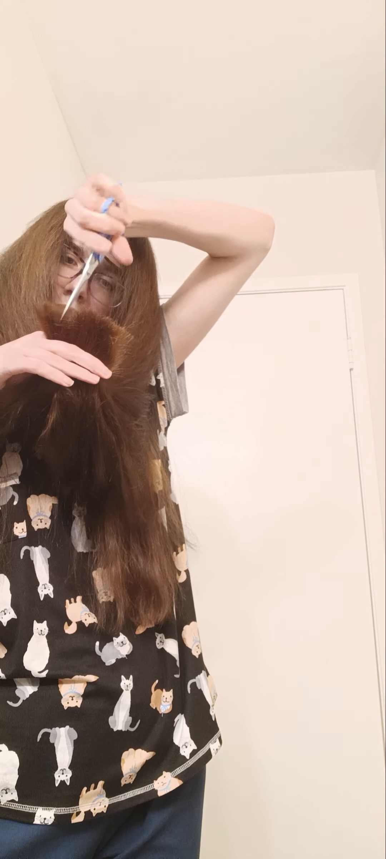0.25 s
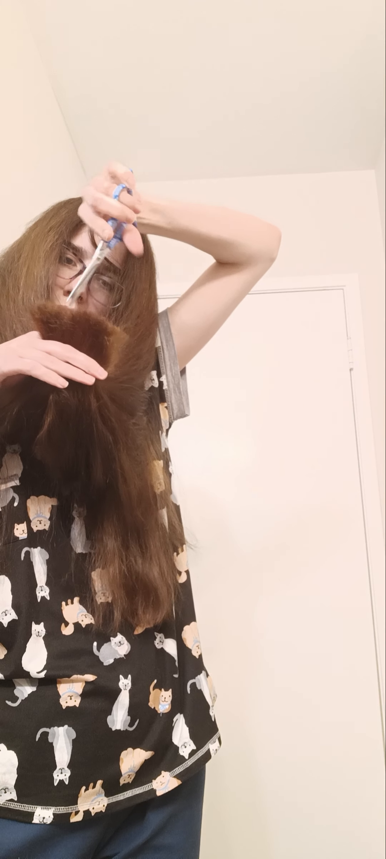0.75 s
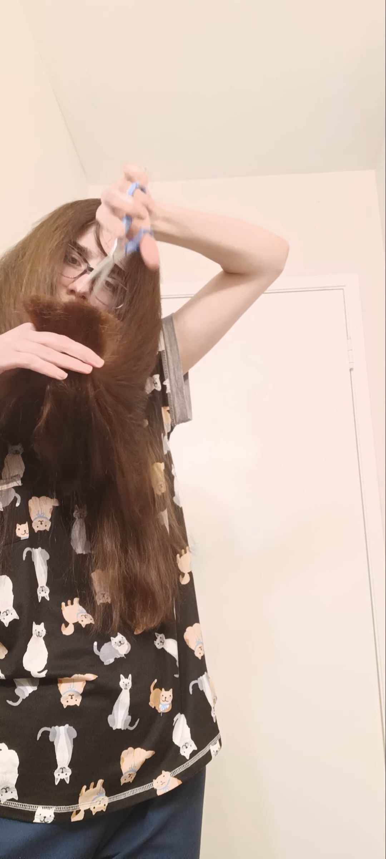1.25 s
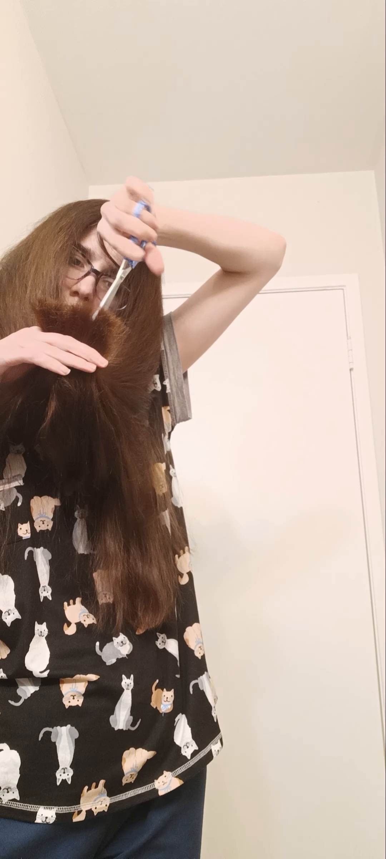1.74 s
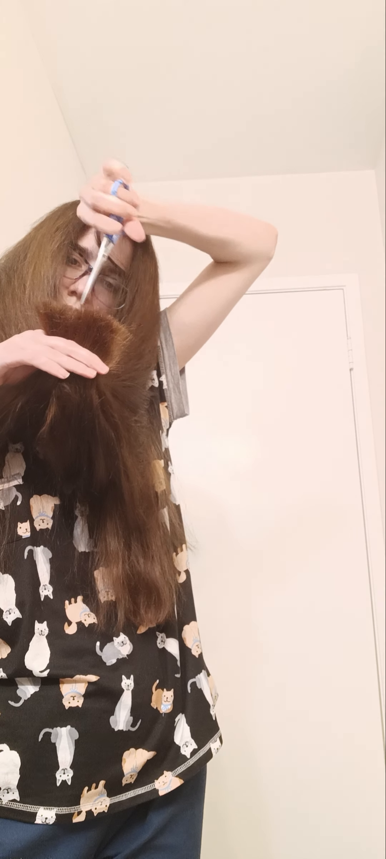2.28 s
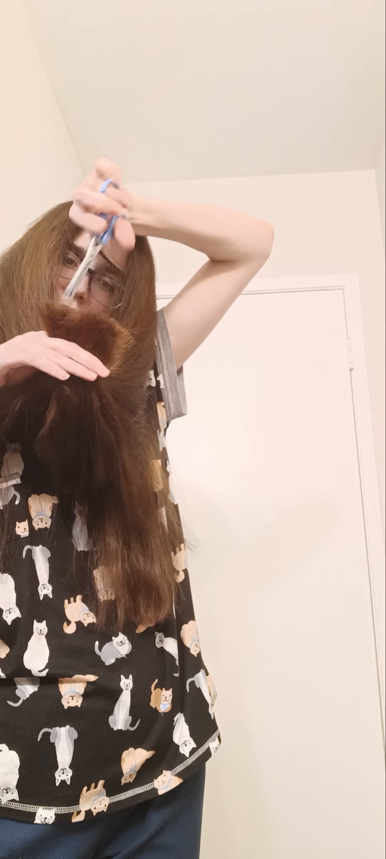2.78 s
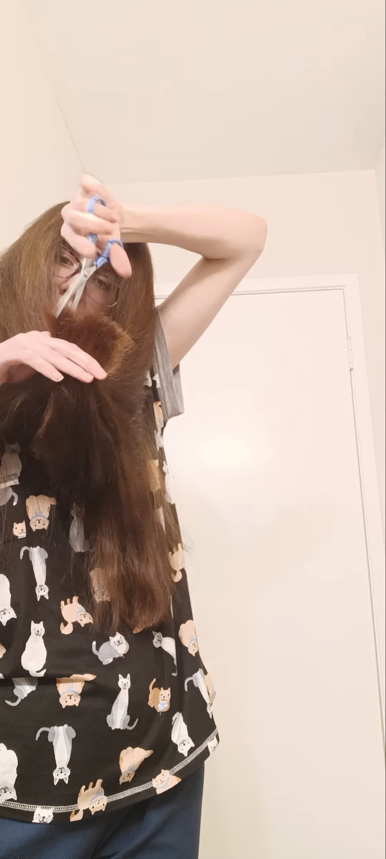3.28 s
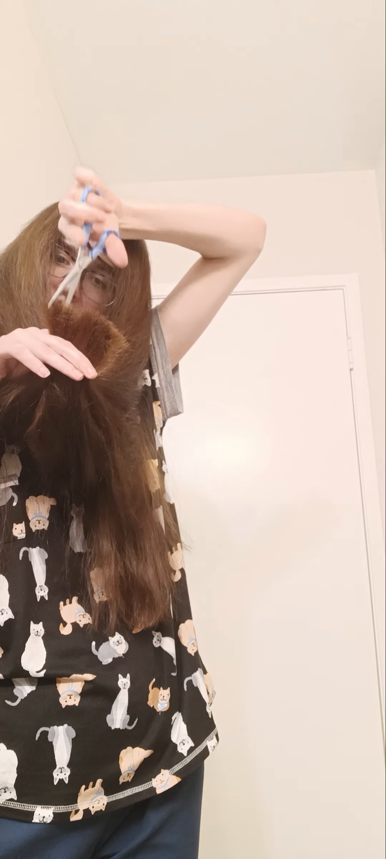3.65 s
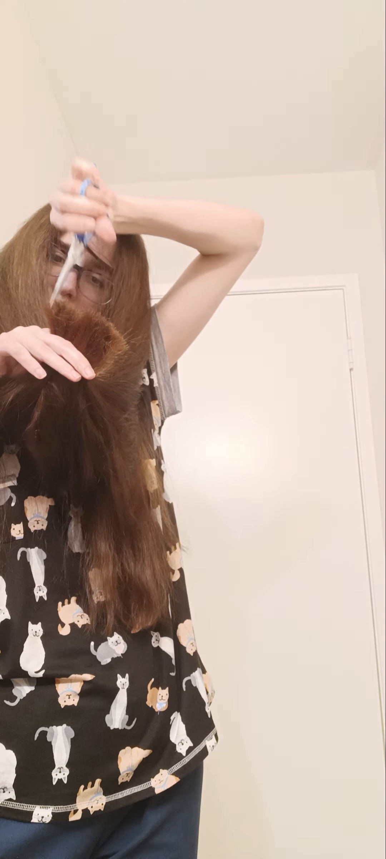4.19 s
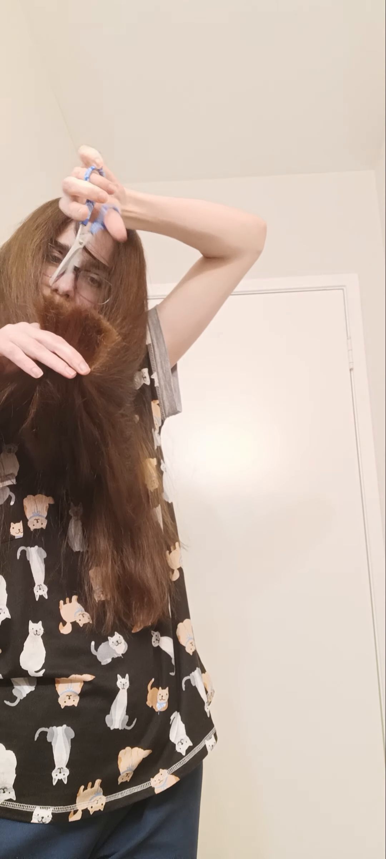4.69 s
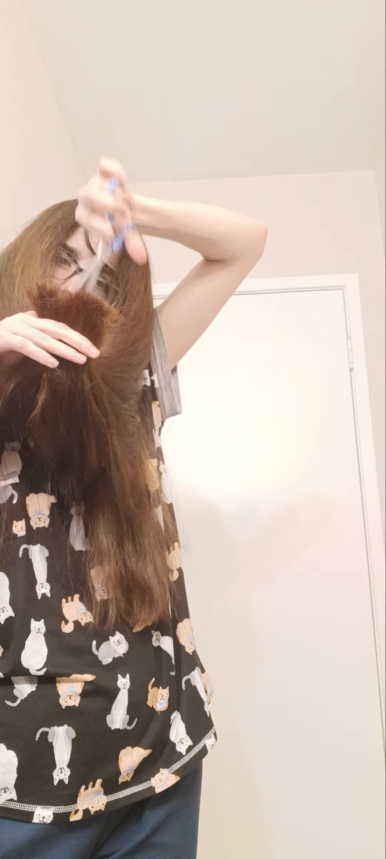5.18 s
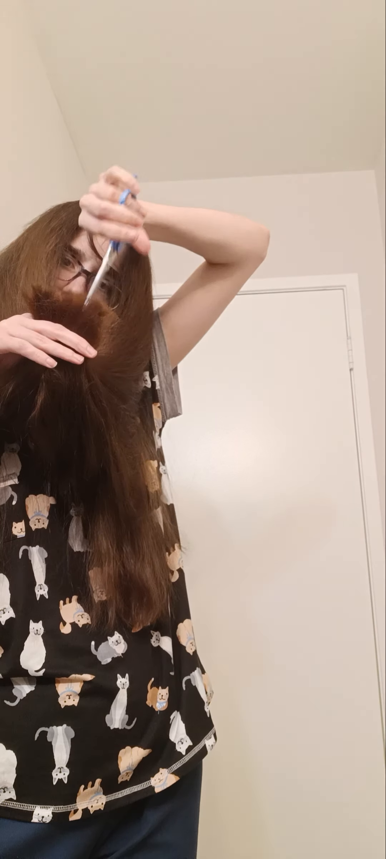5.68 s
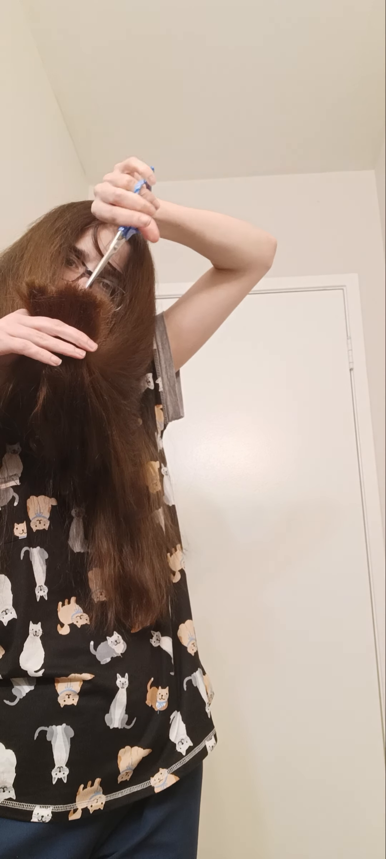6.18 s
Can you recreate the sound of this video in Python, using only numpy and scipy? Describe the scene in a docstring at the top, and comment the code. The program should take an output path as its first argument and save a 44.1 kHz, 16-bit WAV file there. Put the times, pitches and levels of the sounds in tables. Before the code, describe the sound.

In a small, hard room, sixteen scissor strokes follow one another regularly, varying in force. Dry strands crunch briefly, then the blades shut with a crisp, thin metallic snap and a short echo. Late on, one lighter tick comes as the blades spring open. Very quiet fan hum, soft low bumps and air noise fill the gaps, picked up by a close stereo microphone.

```python
"""Steel scissors snip into a bunch of dry hair, sixteen times, in a small hard-walled room.
Each stroke is a crunch of parting strands, then the click of the blades shutting; once they tick on reopening.
Noise bursts and impulses are the forces; the steel's colour and the room's echoes shape them.
Two microphone ports listen, the right one nearer: the room rings for about a third of a second,
over a wavering fan hum, low rumble, soft air noise and a few faint hollow swells."""
import sys
import numpy as np
from scipy import signal
from scipy.fft import rfft, irfft, next_fast_len
from scipy.io import wavfile
from scipy.ndimage import uniform_filter1d, map_coordinates

SR = 44100
rng = np.random.default_rng(int(sys.argv[2]) if len(sys.argv) > 2 else 0)


def materialize(psi):
    """Save the field psi as 16-bit PCM at rate SR to the path in sys.argv[1].

    A 1-D psi becomes a single channel; in a 2-D psi each row is a channel.
    """
    bounded = np.clip(np.atleast_2d(psi).T, -1, 1)
    quanta = np.round(bounded * 32767).astype(np.int16)
    wavfile.write(sys.argv[1], SR, quanta)


N = 283783  # length [samples]


def amp(db):
    """Decibels as an amplitude factor."""
    return 10 ** (np.asarray(db) / 20)


def unit(x):
    """x scaled to rms 1."""
    return x / np.sqrt(np.mean(x ** 2) + 1e-30)


def along(points, hz):
    """(frequency [Hz], value) points read on a log-frequency axis."""
    f, v = np.transpose(points)
    return np.interp(np.log(hz + 1), np.log(f + 1), v)


def wobble(rate):
    """A smooth random curve with rate knots a second."""
    knots = rng.standard_normal(int(N * rate / SR) + 4)
    return map_coordinates(knots, [np.arange(N) * rate / SR])


def hump(s, length):
    """A smooth rise from 0 to 1 and back, centred on time s."""
    t = np.arange(N) / SR
    return np.cos(np.pi * np.clip((t - s) / length, -.5, .5)) ** 2


def filtered(x, gain):
    """x times a gain that is a function of frequency."""
    m = next_fast_len(N + SR // 2)
    return irfft(rfft(x, m) * gain(np.fft.rfftfreq(m, 1 / SR)), m)[..., :N]


def causal(db):
    """The quickest-dying (minimum-phase) response with this dB spectrum (last axis), mean energy 1."""
    cepstrum = np.atleast_2d(irfft(np.log(amp(db))))
    half = cepstrum.shape[1] // 2
    # fold the cepstrum onto positive times
    cepstrum[:, 1:half] *= 2
    cepstrum[:, half + 1:] = 0
    response = irfft(np.exp(rfft(cepstrum)))
    return response / np.sqrt(np.sum(response ** 2) / len(response))


def noise(spectrum, side_db):
    """Stereo noise of rms 1: a shared middle, and a side signal of opposite sign in the two ports."""
    mid, side = filtered(rng.standard_normal((2, N)), lambda hz: amp(along(spectrum, hz)))
    return unit(mid + np.outer([1, -1], amp(side_db) * side))


def add(track, s, sound):
    """Mix a stereo sound into the track at time s."""
    start = max(round(s * SR), 0)
    track[:, start:start + sound.shape[1]] += sound[:, :N - start]


# level difference between the microphone ports: (frequency [Hz], left minus right [dB])
PORT_DIFFERENCE = [(1000, -2), (3000, 0), (5500, 0), (7600, 6), (8500, -1.5), (9600, -13), (11500, -9),
                   (15000, -5)]


def ring(spectrum, bright_db=0, body_db=0, size=1024):
    """The blades' answer to one impulse, as each microphone port colours it."""
    hz = np.fft.rfftfreq(size, 1 / SR)
    tilt = [(3000, body_db), (7000, 0.024), (11000, bright_db)]
    db = along(spectrum, hz) + along(tilt, hz)
    return causal(db + np.outer([.5, -.5], along(PORT_DIFFERENCE, hz)))


# how long the small room rings: (frequency [Hz], time to fall 60 dB [s])
ROOM_DECAY = [(500, 0.26), (2700, 0.31), (7000, .31), (10000, 0.25), (15000, 0.2)]
# what the blades aim straight at the ports: (frequency [Hz], level [dB])
DIRECT_BEAM = [(1500, -7), (3000, -4), (5000, 0), (6800, 0.5), (9500, 1), (12000, -5), (15500, -1.5)]


def room(tail_db=5, build=.003, count=14, size=128):
    """Paths from the scissors to both ports: direct, off near surfaces, then the diffuse tail; energy 1."""
    # tail: noise that dies at each band's own rate, after a build-up [s]
    hz, t, z = signal.stft(rng.standard_normal((2, SR // 2)), SR, nperseg=256)
    decay = amp(-60 * t / along(ROOM_DECAY, hz)[:, None])
    tail = signal.istft(z * decay, SR, nperseg=256)[1]
    tail *= 1 - np.exp(-np.arange(tail.shape[1]) / SR / build)
    paths = amp(tail_db) * tail / np.linalg.norm(tail[0])
    for path in paths:
        # near reflections off head, hand and wall; delays [s]
        delays = np.linspace(.0016, .0054, count) + rng.uniform(-.0003, .0003, count)
        path[(delays * SR).astype(int)] += rng.choice([-1, 1], count) / np.sqrt(count)
    paths[:, :size] += causal(along(DIRECT_BEAM, np.fft.rfftfreq(size, 1 / SR)))
    # the left port is 48 samples farther away
    paths[0] = np.pad(paths[0], (48, 0))[:-48]
    return paths / np.sqrt(np.sum(paths ** 2) / 2)


def heard(force, colour, paths):
    """A force on the blades, rung through the steel and the room."""
    coloured_paths = signal.fftconvolve(colour, paths, axes=1)
    return signal.fftconvolve(force[None], coloured_paths, axes=1)


def strands(length, bite, rate=2500, scatter_db=5, slide=0.42, swell=1.6, clump_db=1.0):
    """Hairs part in little bundles over the hiss of the sliding edges, harder as the blades bite."""
    t = np.arange(int(length * SR)) / SR
    hit = rng.random(len(t)) < rate / SR  # rate [snaps per s]
    size, sign, hiss = rng.standard_normal((3, len(t)))
    snaps = hit * amp(scatter_db * np.clip(size, -2, 2)) * np.sign(sign)
    clumping = map_coordinates(rng.standard_normal(SR // 400), [t * 300])
    bundles = amp(clump_db * np.tanh(clumping))
    texture = unit((unit(snaps) + slide * hiss) * bundles)
    return texture * np.minimum(t / bite, 1) ** swell


# colour of edges sliding, with hair or without: (frequency [Hz], level per Hz [dB])
CRUNCH_SPECTRUM = [(300, -29.5), (1100, -31.5), (2500, -10), (4200, -10.5), (5800, -3.5), (7700, -5),
                   (9600, -4), (12500, -11.5), (15500, -9)]
# the edges slide softly over each other as they open: (time [s], length [s], level [dB])
OPENING_SLIDES = [(0, .02, -66), (1.217, .04, -75.5), (1.64, .05, -80), (4.336, .04, -75)]


def openings():
    """Steel on steel with no hair between: a whisper of the crunch."""
    track = np.zeros((2, N))
    for s, length, db in OPENING_SLIDES:
        slide = strands(length, length / 2)
        add(track, s, amp(db) * heard(slide, ring(CRUNCH_SPECTRUM), room()))
    return track


# fan and mains lines: (frequency [Hz], level relative to the hum level [dB])
HUM_LINES = [(59.3, -6), (120, -8.5), (135.7, 0.5), (437, -16.5), (745, -19.5)]
# the hum swells now and then: (time of the top [s], length [s], rise above the hum level [dB])
HUM_RISES = [(1.34, .2, 8.3), (1.73, .16, 6), (3.03, .3, 11), (6.33, .4, 6.5)]
HUM_DB = -75  # hum level between swells [dB]


def hum(waver_db=2, drift=0.61):
    """Fan and mains lines, each wavering a little in level and pitch; they swell together."""
    t = np.arange(N) / SR
    port_phase = np.array([[0], [.9]])  # [rad]
    lines = 0
    for hz, db in HUM_LINES:
        level = np.sqrt(2) * amp(db + waver_db * wobble(3.9))
        phase = 2 * np.pi * hz * t + drift * wobble(3.2)
        lines = lines + level * np.sin(phase + port_phase)
    level_db = HUM_DB + sum(db * hump(s, length) for s, length, db in HUM_RISES)
    return amp(level_db) * lines * amp([[-1], [1]])  # a little stronger at the right port


# colour of the low rumble: (frequency [Hz], level per Hz [dB])
RUMBLE_SPECTRUM = [(15, -13.5), (28, -6.5), (45, -1), (60, -0.5), (80, -10.5), (110, -7.5), (150, -16.5),
                   (220, -20.5), (400, -65.5)]
# dull low bumps that stand out of the rumble: (time of the top [s], level above the rumble [dB])
RUMBLE_BUMPS = [(1.79, 7.5), (2.05, 3), (4.02, 8), (5.25, 9), (5.98, 9.5), (6.22, 9.5)]
BUMP_S = .12  # length of a bump [s]
# the rumble lifts a little as the arm makes each stroke: lift [dB], lead before the click [s], length [s]
RUMBLE_DB, STROKE_LIFT_DB, STROKE_LEAD_S, STROKE_SPAN_S = -73, 3.5, 0.027, 0.14


def rumble(flutter_db=2, flutter_rate=12):
    """Uneven low noise that lifts with every stroke and at each bump."""
    strokes = sum(hump(s - STROKE_LEAD_S, STROKE_SPAN_S) for s, *_ in STROKES)
    bumps_db = sum(db * hump(s, BUMP_S) for s, db in RUMBLE_BUMPS)
    flutter = flutter_db * wobble(flutter_rate)
    level_db = RUMBLE_DB + STROKE_LIFT_DB * strokes + bumps_db + flutter
    return amp(level_db) * noise(RUMBLE_SPECTRUM, side_db=-9.5)


# colour of the soft air noise: (frequency [Hz], level per Hz [dB])
AIR_SPECTRUM = [(100, -31), (170, -23), (262, -11), (413, -13.5), (499, -18), (741, -16), (862, -22),
                (1230, -22.5), (1770, -26), (1980, -25), (15500, -36.5)]


def background(air_db=-76):
    """A wavering fan hum over low rumble and steady, soft air noise."""
    return hum() + rumble() + amp(air_db) * noise(AIR_SPECTRUM, side_db=-2)


def impact(chatter_db=-23, settle=.002):
    """One hard contact, and a brief chatter that falls 60 dB in settle seconds as the steel settles."""
    t = np.arange(SR // 50) / SR
    force = amp(chatter_db - 60 * t / settle) * rng.standard_normal(len(t))
    force[0] = 1
    return force / np.linalg.norm(force)


# strokes, levels before the gains in scissors(): (time of shutting [s], click level [dB], stroke length [s],
# time to full bite [s], crunch level [dB], click brightness [dB], click body [dB])
STROKES = [(0.146, -30.5, 0.029, 0.026, -39, 1.4, 2), (0.5107, -31.0, 0.034, 0.022, -44, 3.5, 2.3),
           (0.9104, -26, 0.034, 0.011, -45.5, 4, 1.5), (1.3508, -38, 0.09, 0.039, -46, 0, 3),
           (1.7445, -33, 0.048, 0.043, -41.5, 1.5, 2.5), (2.112, -31, 0.053, 0.051, -40.5, -1.7, -0.9),
           (2.4937, -32, 0.04, 0.019, -47, -0.5, -0.3), (2.8804, -32.5, 0.021, 0.02, -35.5, -0.24, 0),
           (3.2883, -27, 0.04, 0.035, -37.5, 2.5, 2), (3.669, -34.5, 0.042, 0.039, -40, 1, 1.5),
           (4.0304, -32.0, 0.025, 0.016, -42.5, -0.9, 1), (4.4067, -32, 0.018, 0.013, -38, -1, 1.56),
           (4.8285, -28.5, 0.029, 0.029, -33.5, 2, 2), (5.213, -26, 0.033, 0.022, -41, 1.5, 1),
           (5.5787, -26, 0.032, 0.02, -40, -3, -2), (6.0612, -33.5, 0.013, 0.0068, -51, -1.5, 1)]
# the blades spring apart, level before the tick gain: (time [s], level [dB])
REOPENING_TICKS = [(5.7314, -37)]
# colour of the blades shutting: (frequency [Hz], level per Hz [dB])
CLICK_SPECTRUM = [(300, -44.5), (800, -36.5), (1000, -41.5), (1700, -20.5), (2150, -21.5), (2800, -10.5),
                  (3700, -18), (5300, -11), (6400, -0.5), (6780, 1), (7400, -0.5), (8800, -4), (9800, -8.5),
                  (11800, -18), (15500, -16.5)]
# colour of the blades springing apart: (frequency [Hz], level per Hz [dB])
TICK_SPECTRUM = [(1000, -36.5), (3550, -33), (3950, -13.5), (4500, -11.5), (5150, -23.5), (5700, -8.5),
                 (6500, -9), (7200, -13), (7900, -3), (10200, -4), (11400, -7), (13400, 3.5), (15500, -6)]


def scissors(click_gain_db=34, crunch_gain_db=3, tick_gain_db=34):
    """Every stroke is a crunch that runs into a click, both along the same paths; a tick is an impact alone."""
    track = np.zeros((2, N))
    for s, click_db, length, bite, crunch_db, bright_db, body_db in STROKES:
        paths = room()
        crunch = heard(strands(length, bite), ring(CRUNCH_SPECTRUM), paths)
        add(track, s - length, amp(crunch_db + crunch_gain_db) * crunch)
        click = heard(impact(), ring(CLICK_SPECTRUM, bright_db, body_db), paths)
        add(track, s, amp(click_db + click_gain_db) * click)
    for s, db in REOPENING_TICKS:
        tick = heard(impact(), ring(TICK_SPECTRUM), room())
        add(track, s, amp(db + tick_gain_db) * tick)
    return track


# faint hollow swells in the background: (start [s], length [s], centre frequency [Hz], level [dB])
HOLLOW_SWELLS = [(0.199, .11, 432.4, -74.5), (0.222, 0.14, 796, -81), (0.336, 0.064, 427.3, -75),
                 (2.951, .16, 806, -86), (3.004, .13, 409.6, -82.5), (4.526, .11, 351.7, -79),
                 (4.878, 0.14, 787, -83), (5.669, 0.16, 320.8, -75), (5.8, .08, 440, -74),
                 (6.092, .07, 615, -79.5)]


def swells(width_hz=45):
    """Narrow, diffuse puffs of low sound rise and fade: noise through one resonance-shaped band."""
    t = np.arange(N) / SR
    track = np.zeros((2, N))
    for s, length, centre, db in HOLLOW_SWELLS:
        hiss = rng.standard_normal((2, N))
        band = unit(filtered(hiss, lambda hz: 1 / (1 + ((hz - centre) / width_hz) ** 2)))
        shape = np.sin(np.pi * np.clip((t - s) / length, 0, 1))
        track += amp(db) * shape * band
    return track


def scene():
    """The scissors at work over the quiet sounds of the room."""
    return scissors() + openings() + swells() + background()


def suppressor(x, threshold_db, depth_db, size=1024):
    """Noise reduction: each band is turned down as it sinks towards its own floor, which shortens the tails."""
    hz, t, z = signal.stft(x, SR, nperseg=size, noverlap=size * 3 // 4)
    power = uniform_filter1d(np.abs(z) ** 2, size=3, axis=2)  # smoothed over time
    power = np.abs(uniform_filter1d(power, size=2, axis=1))  # then over frequency
    quietest = np.quantile(power, 1 / 4, axis=2, keepdims=True)
    floor = uniform_filter1d(quietest, size=5, axis=1)
    threshold = floor * amp(threshold_db) ** 2
    opening = 1 / (1 + (threshold / (power + 1e-30)) ** 2)
    above_bass = hz[:, None] > 200  # the bass passes untouched
    gain = amp(depth_db * (1 - opening) * above_bass)
    return signal.istft(z * gain, SR, nperseg=size, noverlap=size * 3 // 4)[1][:, :N]


TOP_HZ = 15800  # middle of the 200 Hz wide upper cutoff [Hz]


def record(dry):
    """Noise reduction, then nothing above the band limit."""
    quiet = suppressor(dry, threshold_db=7, depth_db=-5)
    return filtered(quiet, lambda hz: np.clip((TOP_HZ - hz) / 200 + .5, 0, 1))


dry = scene()
out = record(dry)
materialize(out)
```